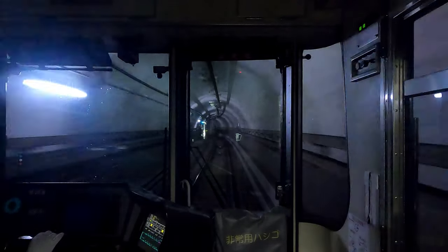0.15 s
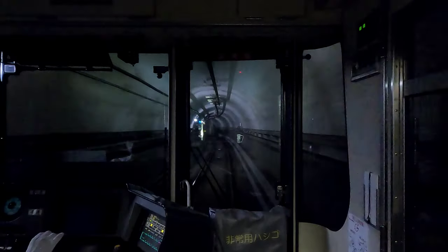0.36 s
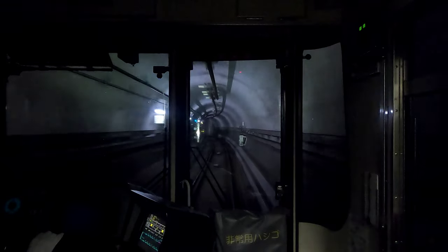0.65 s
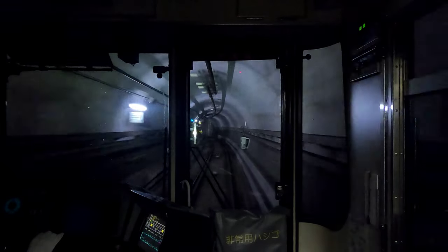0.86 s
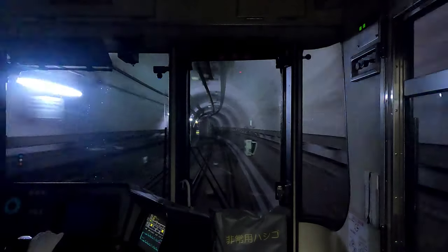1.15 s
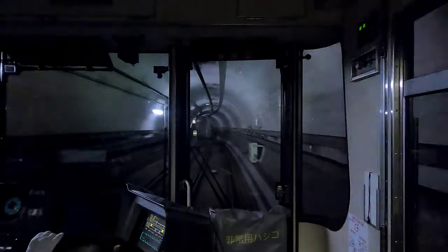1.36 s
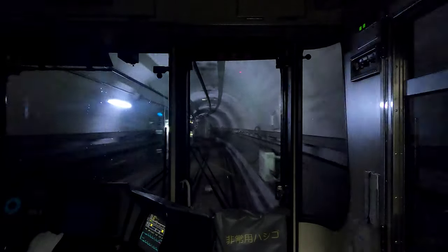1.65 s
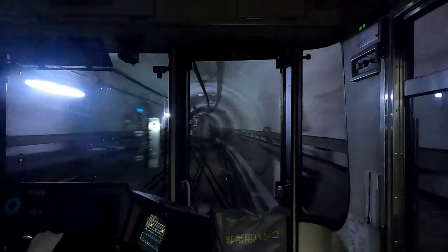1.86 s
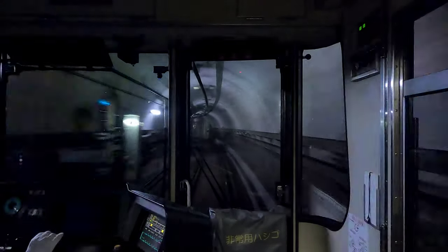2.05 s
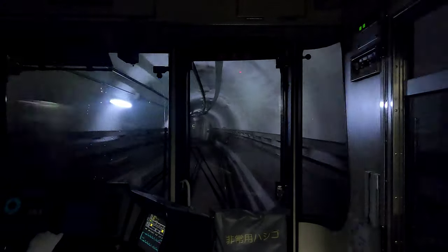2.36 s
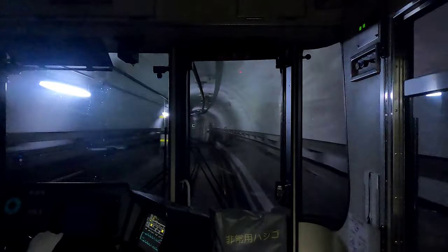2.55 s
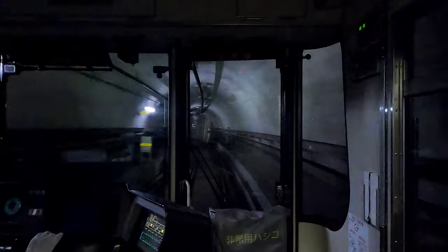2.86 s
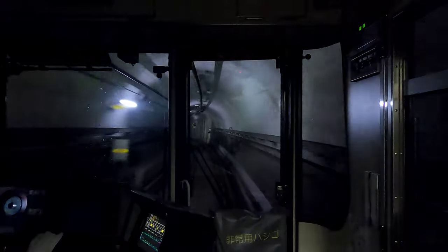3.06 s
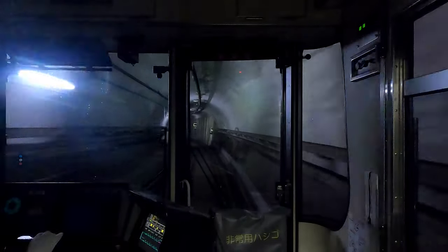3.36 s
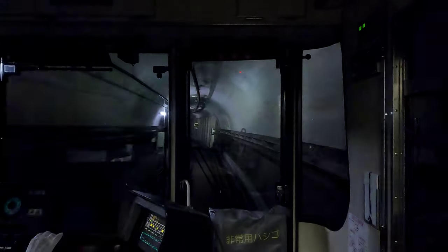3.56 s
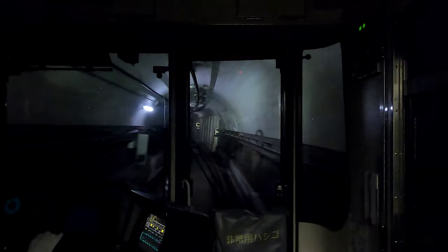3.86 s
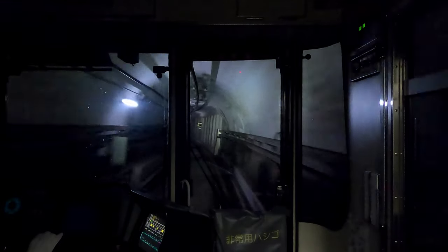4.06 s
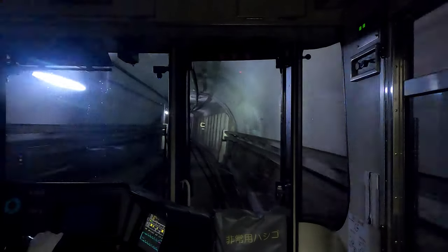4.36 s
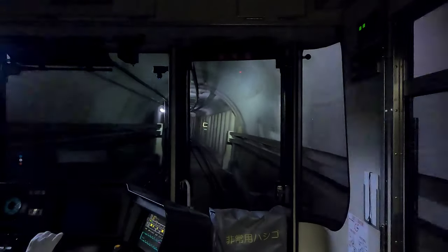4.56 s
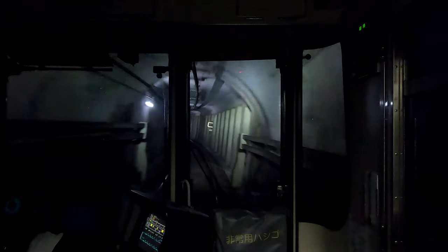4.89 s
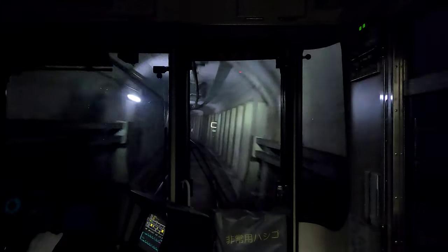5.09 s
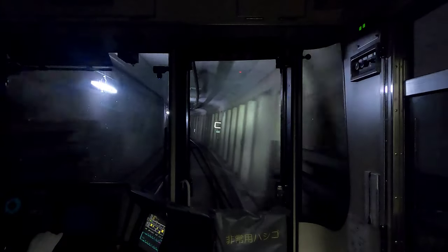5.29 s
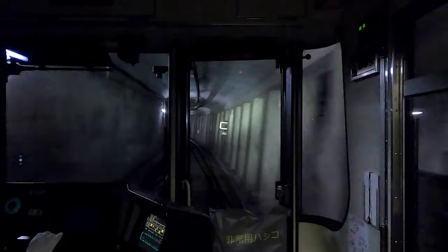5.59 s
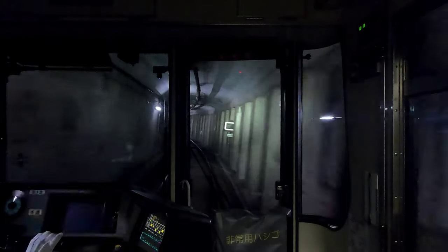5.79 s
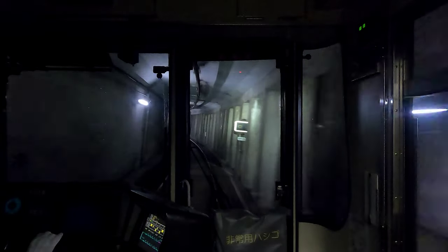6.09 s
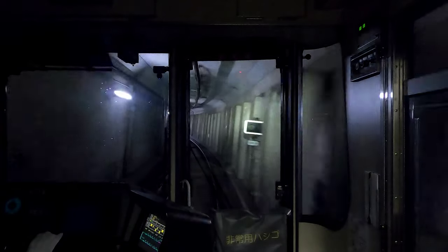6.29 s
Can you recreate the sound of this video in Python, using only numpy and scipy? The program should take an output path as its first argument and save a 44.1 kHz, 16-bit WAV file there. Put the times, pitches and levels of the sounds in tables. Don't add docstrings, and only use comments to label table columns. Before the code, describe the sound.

An electric train rolls steadily through a tunnel, heard in stereo from inside its driving cab. From 0 s a deep, loose boom near the bottom of hearing and a heavy floor rumble surge irregularly, with a faint panel hum and a dense, boxy wheel roar above. Broad noise reflects off the tunnel wall. Soft booming swells pass around 1.5, 2.2 and 3.1 s, stronger near 3.7 and 4.3 s. Flange hiss and airy top rise from about 2.5 s, fullest near 3.4 s, with barely audible thin squeals. From roughly 4.3 s the bend brings out a rough, wavering low rail howl and its octave-like overtone, strongest around 4.9-5.8 s, while the wall wash grows brighter, lifting near 5.9 s. The boom sinks lower towards the end. Fast level control keeps everything compressed; the ride continues to the cut at 6.4 s.

```python
import sys
import numpy as np
from scipy import signal
from scipy.fft import rfft, irfft, next_fast_len
from scipy.io import wavfile

SR = 44100
rng = np.random.default_rng(int(sys.argv[2]) if len(sys.argv) > 2 else 0)


def dump(signal):
    limited = np.clip(np.atleast_2d(signal).T, -1, 1)
    pcm = np.round(limited * 32767).astype(np.int16)
    wavfile.write(sys.argv[1], SR, pcm)


def boost(x):
    u = np.asarray(x, float) / 20
    return 10 ** u


N = 283563
FFT_SIZE = next_fast_len(N)
HZ = np.maximum(np.fft.rfftfreq(FFT_SIZE, 1 / SR), 1)
LOG_HZ = np.log(HZ)


def rms_one(x):
    return x / np.sqrt(np.mean(x ** 2) + 1e-20)


def in_time(rows):
    s, *columns = np.transpose(rows)
    return [np.interp(np.arange(N) / SR, s, c) for c in columns]


def over_hz(rows):
    hz, *columns = np.transpose(rows)
    return [np.interp(LOG_HZ, np.log(hz), c) for c in columns]


def colour(rows):
    inside = (HZ > rows[0][0]) * (HZ < rows[-1][0])
    return boost(over_hz(rows)[0]) * inside


def peak(hz, width):
    return 1 / (1 + (2 * (HZ - hz) / width) ** 2)


def drift(rate):
    r = np.exp(-80 * np.pi * rate / SR)
    noise = rng.standard_normal(N // 40 + 2002)
    slow = signal.lfilter([1], [1, -2 * r, r * r], noise)[2000:]
    return np.interp(np.arange(N) / 40, np.arange(len(slow)), rms_one(slow))


def swells(s, height, length):
    t = np.arange(0, N + 64, 64) / SR
    bumps = height @ np.exp(-(2 * (t - s[:, None]) / length[:, None]) ** 2)
    return np.interp(np.arange(N) / SR, t, bumps)


def wavering(hz, wander_hz, rate):
    return np.sin(2 * np.pi * np.cumsum(hz + wander_hz * drift(rate)) / SR)


# f/Hz, likeness [-1 to 1], left-right level/dB, left lead [rad]
PORTS = [(30, 1, -1.1, 0), (250, .995, -1.3, .02), (420, .975, -1.9, .04), (500, .93, -3, .05),
         (660, .91, -3, .05), (740, .72, -2.5, .4), (900, .8, -3, .3), (1300, .88, -3.5, .2),
         (1900, .7, -4, .3), (3000, .55, -3.5, .8), (4500, .2, -1.6, 0), (6000, .05, .8, 0),
         (8000, -.05, 2.5, 0), (12000, -.08, 0, 0)]


def at_ports(gain, shared=None):
    alike, pan_db, lead = over_hz(PORTS)
    alike = np.clip(alike, -1, 1)
    mid, side = rfft(rng.standard_normal((2, FFT_SIZE)))
    if shared is not None:
        mid = rfft(rms_one(shared), FFT_SIZE)
    sign = np.array([[1], [-1]])
    both = (np.sqrt(1 + alike) * mid + sign * np.sqrt(1 - alike) * side) * gain
    both = both * boost(sign * pan_db / 2) * np.exp(.5j * sign * lead)
    both = irfft(both, FFT_SIZE)[:, :N]
    return both / np.sqrt(np.mean(both.mean(0) ** 2))


# t/s, lean [0-1], flange pressure level/dB
BEND = [(0, 0.04, 0.5), (1.1, 0.02, -1.5), (1.7, 0.22, 0), (2.1, 0, 1), (2.55, 0.2, 2.5), (2.9, .05, 2.5),
        (3.4, 0.42, 5), (3.9, .25, 4), (4.2, 0.51, 2.5), (4.8, .75, 3.5), (5.15, 0.7, 1.5), (5.4, 1, 3.5),
        (5.9, 0.62, 1), (6.2, 0.8, 0), (6.43, 0.5, -1.5)]


def lean():
    return np.clip(in_time(BEND)[0], 0, 1)


def flange_pressure_db():
    return in_time(BEND)[1]


# t/s, f/Hz
BOOM = [(0, 39.07), (1.3, 38.73), (1.9, 35.4), (2.6, 38.72), (3.6, 39.32), (4.4, 41.16), (5.0, 38.74),
        (5.4, 36.6), (5.9, 31.2), (6.43, 30.5)]
# t/s, peak level/dB, length [s]
DIPS = [(0.042, -21, 0.073), (0.286, -21.5, 0.11), (0.898, -24.5, .12), (1.267, -21.5, 0.067),
        (1.472, -19, 0.22), (1.924, -22, 0.22), (2.182, -17.5, 0.074), (2.362, -24.5, .14),
        (2.55, -18, 0.095), (2.801, -22, 0.1), (3.071, -18.5, 0.16), (3.682, -15.5, 0.48),
        (4.003, -20.5, .2), (4.256, -13, 0.15), (4.723, -22, 0.14), (4.988, -24, 0.19), (5.25, -30.5, 0.22),
        (5.558, -17, 0.24), (5.904, -21.5, 0.58), (6.23, -24, 0.2), (6.397, -31, .1)]


def boom():
    s, db, length = np.transpose(DIPS)
    swing = boost(-24.5) + swells(s, boost(db), length)
    tone = wavering(in_time(BOOM)[0], wander_hz=3.52, rate=7.4) * boost(1.2 * drift(11.0))
    return swing * boost(-5.0) * at_ports(peak(33, 40) ** 2, tone)


# f/Hz, level/dB [per Hz]
RUMBLE = [(15, -19), (28, -1), (46, -1), (62, 2), (100, -3.5), (150, -6), (250, -12), (400, -38)]
# t/s, lift level/dB, length [s]
LOADS = [(0.198, -2, .15), (.5, 0, 0.1), (0.744, 3, .2), (1.122, -4, .15), (1.545, 1, 0.34),
         (2.001, 0, 0.22), (2.353, 0, 0.21), (2.641, 0, 0.12), (2.9, -1, 0.18), (3.196, 1.5, .15),
         (3.655, 0, .15), (4.0, 1.5, .15), (4.446, 2, 0.15), (5.045, -3.5, .15), (5.35, -4.5, 0.14),
         (5.604, 1.5, 0.18), (5.851, -2.5, 0.18), (6.103, -1, .1), (6.252, 0.5, 0.13)]


def rumble():
    level_db = -23 - 2.5 * lean() + swells(*np.transpose(LOADS)) + 0.54 * drift(4.0)
    return boost(level_db + 1.5) * at_ports(colour(RUMBLE))


def panel():
    return boost(-30 - 12 * lean()) * at_ports(peak(328, 88) ** 2)


# t/s, lift level/dB, length [s]
PATCHES = [(0.752, 1.5, .3), (1.104, -1.5, 0.11), (1.205, 0, 0.18), (1.552, 0.5, 0.28), (2.2, 1, .2),
           (3.047, -1.5, 0.19), (4.395, 0.5, 0.17), (4.884, 1, 0.16), (5.121, -2.5, .15), (5.324, 0, 0.092),
           (5.417, 0.5, .08), (5.558, 1.5, 0.24), (5.782, 2, 0.081), (5.943, 4.5, .14), (6.126, 3.5, 0.25)]


def patches_db():
    return swells(*np.transpose(PATCHES))


# f/Hz, level/dB [per Hz]
ROAR = [(150, -23), (280, -7.5), (400, -4), (700, -7), (1080, -8.5), (1130, -11.5), (1500, -12.5),
        (2300, -55.5)]
# f/Hz, width [Hz], level/dB
CAB = [(294, 7.4, -1.5), (315.6, 99, 10), (396, 6.9, -3), (425.3, 54, 6), (506, 108, 6), (614, 120, -0.5),
       (617, 114, 7), (694, 18, 1), (770, 79, 7), (925, 142, 8), (1044, 137, 5), (1258, 116, 5)]


def roar():
    level_db = -19.5 + 0.5 * lean() + 0.19 * patches_db() + 0.55 * drift(23.0)
    modes_db = sum(db * peak(hz, width) for hz, width, db in CAB)
    return boost(level_db) * at_ports(colour(ROAR) * boost(modes_db))


# f/Hz, level/dB [per Hz]
WASH = [(900, -20), (1300, -3), (1600, 0), (2000, -4), (2500, -9.5), (3200, -17), (3800, -24), (4400, -33),
        (5500, -50)]


def wash():
    patch_db = patches_db()
    wash_db = -37.5 + 3 * lean() + patch_db + 1.5 + 0.86 * drift(29.0)
    rush_db = -56 + 14 * lean() + 0.67 * patch_db + 1.9 * drift(9.0)
    bright_edge = boost(rush_db) * at_ports(peak(2300, 1600) ** 2)
    return boost(wash_db) * at_ports(colour(WASH)) + bright_edge


# t/s, lift level/dB, length [s]
RIPPLES = [(0.133, 1, 0.064), (0.427, 0, 0.087), (1.942, 2.5, 0.087), (3.271, 0, 0.082), (3.66, -2, 0.092),
           (4.366, 3.5, 0.21), (4.636, 2.5, 0.26), (4.86, 5, 0.13), (5.2, 5.5, .1), (5.424, 7, 0.27),
           (5.807, 6.5, 0.13), (5.994, 2.5, 0.08), (6.109, -1.5, 0.082), (6.219, 3.5, 0.15)]
# t/s, f/Hz, second multiple f/Hz
PITCH = [(0, 200.5, 435), (2.0, 192, 435), (3.3, 200.1, 435), (3.9, 213.7, 430), (4.3, 224, 430),
         (4.5, 208.9, 460), (4.65, 201.2, 445), (4.87, 190.3, 440), (5.05, 211.9, 450), (5.2, 220.4, 452),
         (5.4, 215.9, 440), (5.52, 201.7, 470), (5.74, 204.2, 440), (5.86, 226.2, 440), (6.0, 187.6, 435),
         (6.12, 211.7, 440), (6.28, 199.7, 420), (6.43, 189.5, 420)]
# t/s, lift level/dB, length [s]
LOCKS = [
    (4.149, 2.5, .2),
    (4.6, 3.5, 0.3),
    (5.149, 6, 0.23),
    (5.546, -6, 0.14),
    (6.096, 3, .1),
    (6.301, 12, 0.077),
]


def howl():
    scatter_rate = 9.02
    hz, second_hz = in_time(PITCH)

    hz = hz + 7.52 * drift(scatter_rate)
    ripple = wavering(hz, wander_hz=4.23, rate=8.46) * boost(1.1 * drift(14.0))
    outer = wavering(243.3, wander_hz=10.71, rate=7.0)
    ripple += 0.9 * outer * boost(-4.5 * lean() + 2.0 * drift(2.9))
    band = 1 / (1 + ((HZ - 218) / 50) ** 6)
    clear = np.clip(0.03 + 0.6 * lean(), 0, .5)
    first = np.sqrt(clear) * at_ports(band, ripple) + np.sqrt(1 - clear) * at_ports(band)
    first_db = -24.5 + 4 * lean() + swells(*np.transpose(RIPPLES)) + 0.37

    second_hz = second_hz + 9.0 * drift(scatter_rate)
    strand = wavering(second_hz, wander_hz=4.285, rate=11.12) * boost(1.7 * drift(12.0))
    second = 0.64 * at_ports(peak(445, 170), strand) + 0.7 * at_ports(peak(453, 95) ** 2)
    second_db = -45 + 17.5 * np.minimum(lean() / 0.55, 1) + swells(*np.transpose(LOCKS))

    upper_db = -35.5 - lean() + 2.5 * drift(4.8)
    upper = at_ports(peak(495.6, 45) ** 2)

    fourth_db = -42.5 + 7.2 * lean() + 3.4 * patches_db()
    fourth = at_ports(peak(846, 170) ** 2)
    return boost(first_db) * first + boost(second_db) * second + boost(upper_db) * upper + boost(fourth_db) * fourth


# f/Hz, level/dB [per Hz]
HISS = [(2000, -12), (2900, 7), (3600, 4), (4200, 1.5), (5200, -1), (6200, -3.3), (7880, -5.3),
        (7960, -8.5), (9600, -10), (10400, -20), (11000, -32)]
# f/Hz, level/dB [per Hz]
AIR = [(9800, -10), (10500, 1), (11600, -6), (12600, -3.5), (13200, -6), (14700, -10), (15100, -13),
       (15800, -20)]
# t/s, level/dB
AIR_OPEN = [(0, -4), (.5, -3), (1.2, 1), (1.8, -4), (2.05, 3), (2.6, 8.5), (3.4, 5.5), (4.1, 5.5), (4.7, 8),
            (5.0, 2.5), (5.3, 3.5), (5.6, .5), (6.43, -2.5)]
# t/s, lift level/dB, length [s]
TOUCHES = [(.32, 2, .15), (.72, 1, .15), (1.32, 1.5, 0.09), (1.49, 2.5, .06), (2.478, 1, .08),
           (4.39, 1.5, .06), (4.665, 1, .06), (4.91, 4.7, .11), (5.05, 1.5, .1), (5.381, 1.5, .08),
           (5.762, 2.5, .05), (5.93, 1, .08), (6.1, 3, .1), (6.22, 2, .1)]
# f/Hz, width [Hz], level/dB [over air], left-right level/dB
SQUEALS = [(7510, 60, -6, 4), (7850, 110, -5, 4)]


def flanges():
    touch_db = swells(*np.transpose(TOUCHES))
    hiss_db = -59.5 + flange_pressure_db() + touch_db
    air_db = -84 + in_time(AIR_OPEN)[0] + 1.1 * touch_db
    out = boost(hiss_db + 5.9 + .7 * drift(16.0)) * at_ports(colour(HISS))
    out += boost(air_db - .3) * at_ports(colour(AIR))
    for hz, width, db, pan_db in SQUEALS:
        spell = boost(air_db + db + 3.0 * drift(4.0))
        sides = boost([[pan_db / 2], [-pan_db / 2]])
        out += spell * at_ports(peak(hz, width) ** 2) * sides
    return out


def scene():
    rolling = rumble() + panel() + roar() + wash()
    return boom() + rolling + howl() + flanges()


def top_cut(x):
    return signal.sosfilt(signal.butter(12, 15520, fs=SR, output="sos"), x)


def record(dry):
    keep = np.exp(-1 / (0.0065 * SR))
    now = np.mean(dry ** 2, axis=0)
    power = signal.lfilter([1 - keep], [1, -keep], now, zi=[np.mean(dry ** 2)])[0]
    gain = (power / np.mean(power) + 1e-9) ** -.22
    to_edge_s = np.minimum(np.arange(N), np.arange(N)[::-1]) / SR
    gain = gain * np.clip(to_edge_s / .004, .25, 1)
    return top_cut(dry * gain)


dry = scene()
out = record(dry)
dump(out)
```